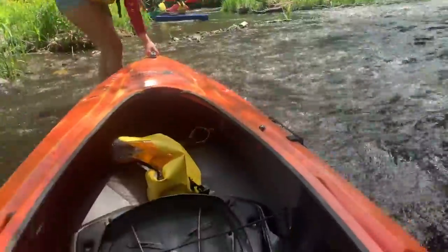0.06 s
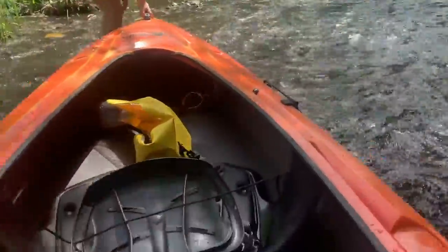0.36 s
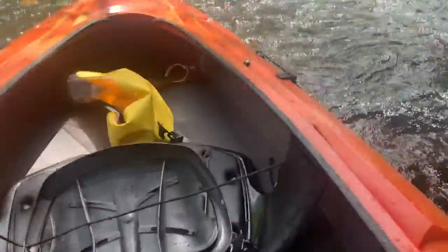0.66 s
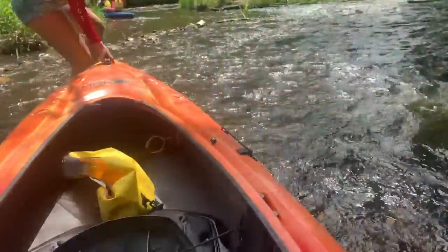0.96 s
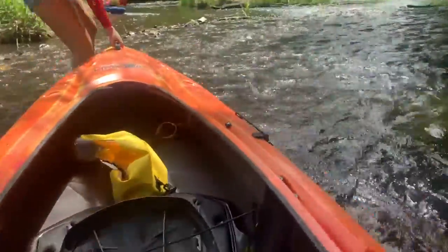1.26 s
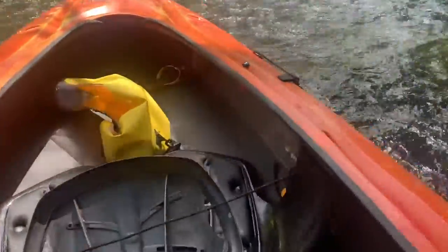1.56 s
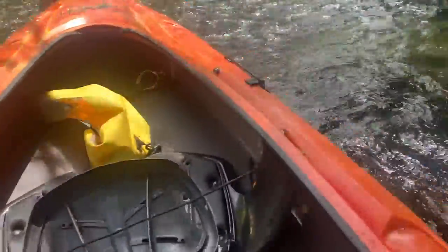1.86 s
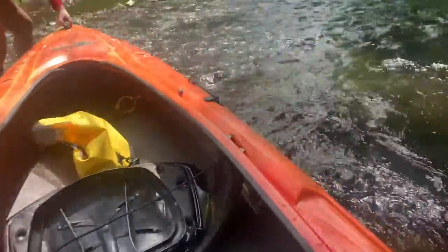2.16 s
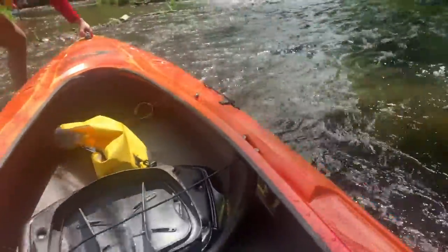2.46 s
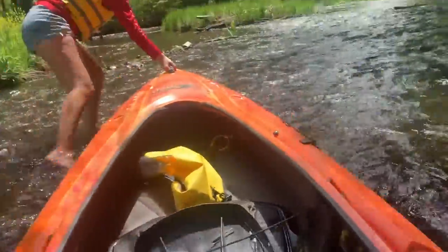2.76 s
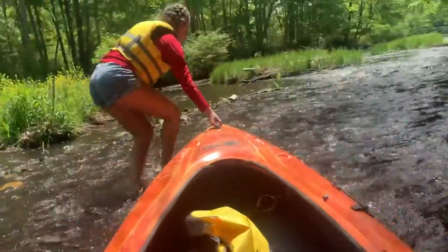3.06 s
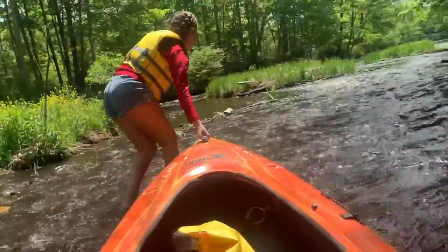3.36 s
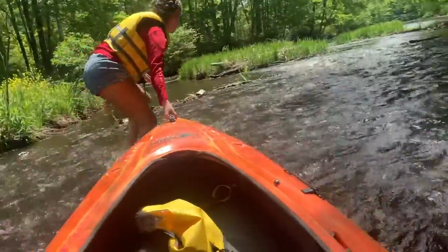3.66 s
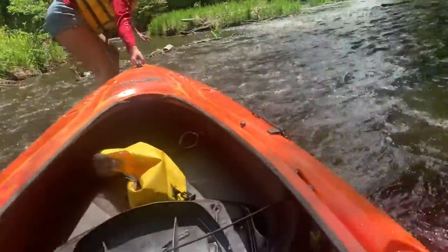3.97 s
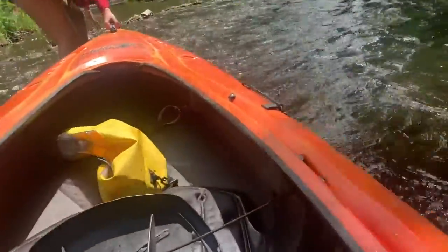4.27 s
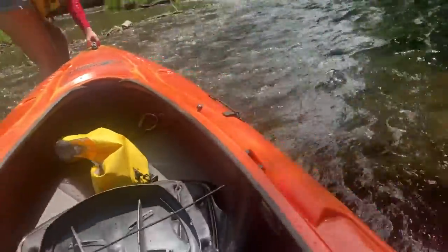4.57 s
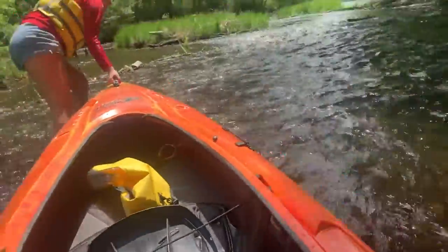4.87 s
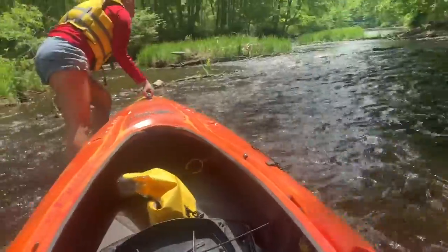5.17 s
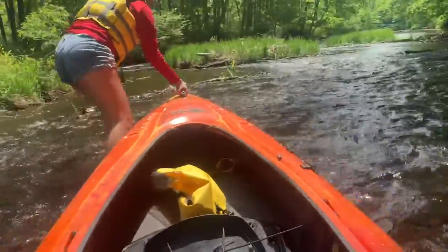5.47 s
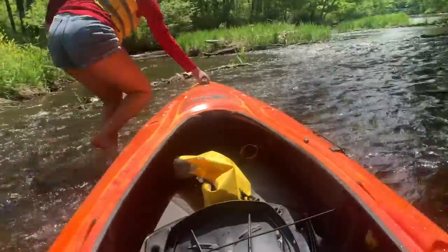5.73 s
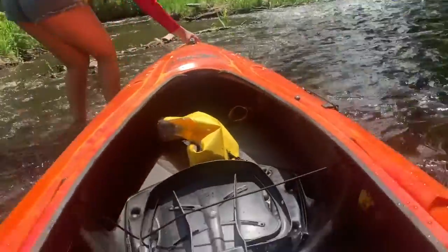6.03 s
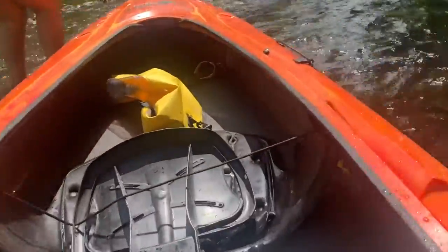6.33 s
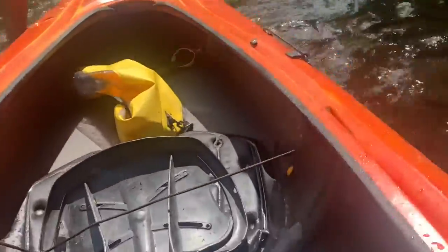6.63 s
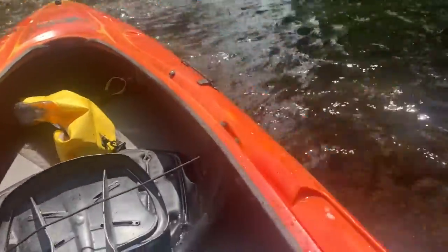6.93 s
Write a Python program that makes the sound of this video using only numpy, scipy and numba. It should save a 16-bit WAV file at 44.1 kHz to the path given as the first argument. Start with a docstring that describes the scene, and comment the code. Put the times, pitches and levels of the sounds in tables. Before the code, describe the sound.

Shallow river water rushes and bubbles around a plastic kayak being towed over a stony bed. The microphone sits in the cockpit, right above a low, uneven grinding and the drone of the hollow hull. Stones thud and crack against the shell, and the floor booms, most strongly near the middle and towards the end. Drips and fine spray tick nearby, a little wind rumbles, and it ends on a splashy bump.

```python
"""Water churns and plinks close by over a low scrape: a plastic kayak is being towed by its bow through
a stony riffle, with the microphone in the cockpit. The current, wading legs and the bow throw spray and
fold in air that rings as bubbles. Right underneath, the hull grinds over gravel and knocks on stones,
its floor booms as it springs back, and the air inside drones. A little wind buffets the two
microphone ports, and a few drops tap beside the right one."""
import sys
import numpy as np
from scipy import signal
from scipy.fft import rfft, irfft
from scipy.io import wavfile
from scipy.ndimage import uniform_filter1d
from numba import njit

SR = 44100
rng = np.random.default_rng(int(sys.argv[2]) if len(sys.argv) > 2 else 0)


def wav_out(sig):
    """Save sig, one row per channel (or a flat mono array), as 16-bit PCM at SR to the path in sys.argv[1]."""
    wavfile.write(sys.argv[1], SR, np.round(np.clip(np.atleast_2d(sig).T, -1, 1) * 32767).astype(np.int16))


N = 308700
TIME = np.arange(N) / SR
TOP_HZ = 15900

# gusts at the microphone: start_s, length_s, level_db
WIND_GUSTS = [(3.0, 0.75, -38.5), (4.12, 0.062, -26), (6.2, 0.55, -38), (6.68, 0.34, -41)]
# spectrum of the eddies at the ports: frequency_hz, gain_db
WIND_SPECTRUM = [(10, -37), (28, -9), (50, 9), (90, -6), (160, -7.5), (400, -49), (2000, -56), (8000, -90)]
# drops landing beside the right port: start_s, level_db, decay_s, centre_hz
PORT_TAPS = [(4.216, -21, .004, 800), (4.2528, -18, .0012, 950), (6.5635, -15.5, .0012, 900),
             (6.571, -17, .001, 1900)]
# water surging round the legs and the bow: start_s, length_s, churn_db, spray_db
WATER_SURGES = [(0.776, 0.32, -50.5, -51), (0.954, 0.023, -40, -52), (1.266, 0.031, -42.5, -38),
                (1.38, 0.28, -50, -57), (1.813, 0.53, -44.5, -45), (2.438, 0.14, -44.5, -43.5),
                (2.597, 0.14, -44.5, -41.5), (3.065, 0.061, -46.5, -43), (4.033, 0.63, -52.5, -52),
                (4.444, 0.37, -48, -47), (4.543, 0.16, -41.5, -45), (4.882, 0.74, -51, -52),
                (5.64, 0.19, -50, -48), (5.877, 0.14, -50.5, -46), (6.34, 0.19, -50, -48),
                (6.616, 0.37, -49, -51.5), (6.774, 0.096, -39.5, -44.5)]
# spectrum of the churning water: frequency_hz, gain_db
CHURN_SPECTRUM = [(100, -13), (300, -8), (600, 9.5), (1000, 5), (1800, -0.7), (3000, -5.5), (4200, -11.5),
                  (5500, -23.5), (8000, -151)]
# spectrum of the fine spray: frequency_hz, gain_db
SPRAY_SPECTRUM = [(1000, -30), (4000, -14), (5500, -10), (6500, -3.5), (7400, 0), (10000, -2),
                  (13000, -3.5), (16000, -7)]
# flung spray and drips falling back: start_s, level_db, decay_s, centre_hz
NEAR_SPLASHES = [(.079, -30, .011, 3700), (.579, -31, .0015, 9000), (.644, -32, .004, 12500),
                 (.799, -30, .002, 9500), (.853, -30, .003, 9500), (.957, -30, .002, 9000),
                 (.974, -29, .002, 9000), (1.2446, -25, .0026, 9500), (1.274, -30, .003, 9000),
                 (1.482, -28, .002, 10500), (1.587, -28, .003, 8000), (1.917, -25.5, .002, 9500),
                 (2.206, -26, .002, 9700), (2.326, -26, .002, 8500), (2.493, -25, .003, 8500),
                 (2.918, -30, .0045, 3600), (3.049, -27, .004, 9000), (3.114, -26, .005, 9000),
                 (3.232, -21.5, .004, 8700), (3.279, -29, .006, 9000), (3.327, -30, .008, 3400),
                 (3.75, -25, .003, 9500), (3.843, -29, .0015, 9500), (4.062, -28, .004, 9500),
                 (4.352, -26, .002, 12000), (4.656, -26, .002, 9500), (5.073, -25, .0012, 9500),
                 (5.085, -24, .0012, 12000), (5.13, -26.5, .0025, 9700), (5.405, -24.5, .0015, 9300),
                 (5.711, -26, .002, 9000), (5.746, -26, .003, 9000), (5.935, -28, .004, 3600),
                 (5.9355, -20.5, .0048, 9050), (6.013, -27.5, .003, 9100), (6.022, -28.5, .003, 9500),
                 (6.5, -28, .004, 9000), (6.535, -30, .016, 2980), (6.596, -29, .004, 9000),
                 (6.699, -29, .002, 13000), (6.789, -28, .008, 2300), (6.801, -22, .004, 7600),
                 (6.83, -19, .002, 11000), (6.84, -20, .003, 7500), (6.851, -23, .003, 9000),
                 (6.914, -27, .004, 2400), (6.987, -17, .0013, 11000)]
# big air pockets by the legs and under the hull: start_s, level_db, pitch_hz, length_s
AIR_GULPS = [(.745, -31, 234, 0.047), (0.989, -17.5, 195, 0.014), (2.147, -29.5, 274.5, 0.068),
             (2.195, -20.5, 184.5, 0.046), (2.245, -29, 203, 0.034), (2.617, -21, 272, 0.031),
             (4.102, -16, 209, 0.038), (5.387, -17.5, 230, 0.014), (5.403, -20, 179, 0.0153),
             (5.793, -27, 195, 0.018), (5.968, -15.5, 179.5, 0.028), (5.99, -13.5, 222, 0.015)]
# the clearest bubbles, from deep glugs to small drops: start_s, level_db, pitch_hz
NEAR_BUBBLES = [(.058, -24, 1040), (.058, -29, 760), (.23, -33, 1490), (.256, -31, 680), (.358, -32, 520),
                (.509, -33, 1330), (.512, -33, 400), (.839, -30, 1270), (1.284, -34, 2470),
                (1.294, -32, 1700), (1.835, -26, 430), (2.311, -29, 8250), (2.527, -31, 1830),
                (2.634, -20.5, 560), (2.637, -29, 2300), (2.646, -30, 1900), (2.72, -29, 1450),
                (2.732, -29, 1320), (2.918, -27, 2450), (3.054, -32, 3650), (3.087, -30, 1270),
                (3.36, -30, 1440), (3.551, -24.5, 1690), (3.667, -31, 3060), (4.094, -24, 680),
                (4.128, -29.5, 1880), (4.28, -31, 750), (4.453, -30, 8400), (4.479, -30, 4420),
                (4.625, -17.5, 1870), (4.777, -30, 7560), (5.353, -27, 570), (5.435, -24, 740),
                (5.677, -33, 2890), (5.935, -24, 650), (6.524, -31, 850)]
# air droning in the hull, before the floor pumps it: time_s, level_db
AIR_DRONE = [(0, -44.5), (.75, -33), (.95, -29.5), (2, -36.5), (2.5, -46), (3.3, -47), (5.2, -41.5),
             (6.6, -43.5), (7, -32)]
# modes of the plastic shell: pitch_hz, width_hz, gain_db
HULL_MODES = [(140.7, 19.6, 22), (164.5, 23, 16.5), (175, 20, 3), (226, 9.4, 9), (266, 23, -5.5),
              (311.8, 8.2, 12), (387, 53, -12), (459, 86, 2.5), (540, 71, -23), (701, 35, 4)]
# the hull scraping over the bed and heaving its floor: start_s, length_s, load_db, floor_db
BED_SCRAPES = [(0, 0.45, -40.5, -77), (0.664, 0.13, -31, -45), (0.834, 0.17, -32, -28.5),
               (1.413, 0.29, -35.5, -61), (1.79, 0.27, -31, -36.5), (2.117, 0.13, -33, -37.5),
               (2.484, 0.23, -31, -34.5), (2.822, 0.47, -41.5, -41.5), (3.458, 0.041, -33, -23),
               (3.858, 0.87, -40.5, -41), (4.405, 0.32, -27.5, -24), (4.765, 0.25, -42.5, -43),
               (5.39, 0.22, -36.5, -36), (5.574, 0.14, -31, -40), (5.794, .23, -29.5, -31.5),
               (6.06, 0.36, -38, -58), (6.65, 0.21, -38, -34.5), (6.837, 0.064, -27, -23)]
# spectrum of the grinding contact: frequency_hz, gain_db
GRIND_SPECTRUM = [(60, -20), (130, -12), (220, 6.5), (350, 3), (550, 0.5), (900, -9), (1800, -12),
                  (4000, -24)]
# the floor springing back off a stone: start_s, level_db, pitch_hz, t60_s
FLOOR_BOOMS = [(0.886, -25, 102, 0.17), (1.031, -14.5, 84.5, 0.15), (2.895, -6.5, 84, 0.17),
               (3.479, -15.5, 88.7, 0.44), (4.699, -17.5, 82.3, 0.55), (5.422, -17.5, 90.3, 0.23),
               (5.788, -10, 108, 0.12), (6.902, -9.5, 83, 0.27)]
# stones striking the hull: start_s, level_db, first_pitch_hz, length_s, crack_db (against the thud)
STONE_KNOCKS = [(.599, -21, 792, 0.063, 0.5), (0.818, -25.5, 364, 0.022, -20), (0.839, -23, 520, .022, 1),
                (0.966, -20.5, 420, 0.02, -12), (1.295, -29.5, 477, 0.088, -8),
                (1.632, -15.5, 648, 0.057, 1.5), (1.884, -23, 650, 0.0049, 1.5),
                (1.933, -21.5, 426, 0.012, -4), (2.021, -18, 334, 0.0073, -20),
                (2.055, -25, 282, 0.005, -22), (2.198, -15, 267, .014, -28), (2.528, -19, 342, 0.019, -22),
                (2.608, -24, 282, 0.032, -10), (2.672, -31, 520, 0.0051, -9), (2.72, -23.5, 403, 0.05, -10),
                (2.88, -17.5, 232, 0.018, -31), (3.464, -14, 322, 0.0043, -19),
                (3.478, -14, 243, 0.016, -28), (4.195, -20.5, 290, 0.02, -20),
                (4.452, -24.5, 265, .21, -26), (4.498, -13.5, 634, .018, 1.5), (4.522, -17, 328, .008, -20),
                (5.135, -26.5, 665, 0.0063, -13), (5.266, -19.5, 596, 0.031, -1.5),
                (5.294, -17, 241, 0.014, -25), (5.338, -19.5, 628, 0.016, -20),
                (5.763, -18.5, 597, 0.044, -2.5), (5.805, -13.5, 252, .008, -21),
                (5.828, -13, 270, 0.008, -26), (5.841, -10.5, 426, 0.0024, -16),
                (5.861, -20, 333, 0.0047, -14), (5.924, -23.5, 463, 0.009, -15),
                (6.027, -21.5, 330, 0.0058, -6), (6.083, -25.5, 535, 0.068, -15),
                (6.669, -24.5, 198, 0.031, -30), (6.8127, -12.5, 530, 0.0063, -5.5),
                (6.823, -19, 403, 0.029, -9), (6.886, -19.5, 276, 0.013, -15)]
# the right port against the left: frequency_hz, gain_db, phase_rad, coherence
RIGHT_PORT = [(30, 0, 0, .97), (200, -.5, -.1, .99), (300, 1.5, -.35, .88), (365, 4.5, -.8, .55),
              (430, 2, -1.5, .9), (700, -5, -1.5, .85), (1000, -8, -1.5, .15), (1150, -7, -4.5, .35),
              (1400, -5, -5.1, .7), (1900, -6, -5.6, .62), (2400, -7, -4.5, .1), (2900, -7, -2.9, .6),
              (3600, -10, -2.8, .35), (4100, -9, -.8, .55), (5400, -3, -.2, .65), (6300, -.5, 2.7, .97),
              (7300, 0, 3.55, .97), (9280, 0, 6.28, .88), (16000, 0, 15.4, .8)]


def undb(db):
    """Decibels to gain."""
    return 10 ** (np.asarray(db) / 20)


def unit(x):
    """Scale to rms 1."""
    return x / np.sqrt(np.mean(x ** 2))


def peak(x):
    """Scale to peak 1."""
    return x / np.abs(x).max()


def filtered(x, response):
    """Pass x through a response given as a function of frequency."""
    size = x.shape[-1]
    hz = np.maximum(np.fft.rfftfreq(size, 1 / SR), 1)
    return irfft(rfft(x) * response(hz), size)


def colour(x, spectrum):
    """Shape x by (frequency_hz, gain_db) points."""
    hz, db = np.transpose(spectrum)
    return filtered(x, lambda f: undb(np.interp(np.log(f), np.log(hz), db)))


def resonance(f, hz, width):
    """Response of one damped mode, gain 1 at its centre."""
    return 1 / (1 + 1j * (f * f - hz * hz) / (f * width))


def band(x, hz, width_hz, order=2):
    """Pass x through the same resonance order times."""
    return filtered(x, lambda f: resonance(f, hz, width_hz) ** order)


def noise(size=N):
    """Two unrelated rows of white noise."""
    return rng.standard_normal((2, size))


def walk(rate_hz):
    """Random levels held 1 / rate_hz seconds and smoothed twice; spread near 1."""
    hold = int(SR / rate_hz)
    steps = np.repeat(rng.standard_normal(N // hold + 1), hold)
    return 1.3 * uniform_filter1d(uniform_filter1d(steps, hold), hold)[:N]


def add(out, start_s, x):
    """Mix x into out from start_s on."""
    i = max(int(start_s * SR), 0)
    out[:, i:i + x.shape[-1]] += x[..., :max(N - i, 0)]


def swells(rows, rest_db, attack_s, release_s, column=2):
    """Level in dB of swells that rise, hold and die over a resting level; column holds their level_db."""
    power = undb(rest_db) ** 2
    for start_s, length_s, level_db in np.array(rows)[:, [0, 1, column]]:
        rise = np.clip((TIME - start_s) / attack_s, 0, 1)
        fall = np.exp(-np.maximum(TIME - start_s - length_s, 0) / release_s)
        power = power + (undb(level_db) * rise * fall) ** 2
    return 10 * np.log10(power)


def wind():
    """Eddies buffet each microphone port on its own."""
    eddies = unit(colour(noise(), WIND_SPECTRUM))
    gust_db = swells(WIND_GUSTS, rest_db=-45.5, attack_s=0.088, release_s=0.091)
    return eddies * undb(gust_db + 0.5 * walk(16))


def lapping(level_db=-49):
    """Ripples pat the side of the boat and keep one hollow note of the shell murmuring."""
    return undb(level_db) * unit(band(noise(), hz=214.8, width_hz=36))


@njit
def ring_bubbles(start_s, size, hz, cycles, glide, scatter_rad):
    """Bubbles ring down and rise in pitch; row 0 is direct, row 1 scattered with its own phase."""
    out = np.zeros((2, N))
    for k in range(len(start_s)):
        start, length, phase = int(start_s[k] * SR), cycles[k] * SR / hz[k], 0.
        for i in range(min(int(length), N - start)):
            age = i / length
            phase += 2 * np.pi * hz[k] * (1 + glide * age) / SR
            envelope = 2 * size[k] * np.exp(-6 * age) * min(10 * age, 1.)
            out[0, start + i] += envelope * np.sin(phase)
            out[1, start + i] += envelope * np.sin(phase + scatter_rad[k])
    return out


def riffle(churn_db, spray_db, count=40000, far_hiss_db=-55):
    """All round the boat, a cloud of bubbles over a smooth rush; churn drives the lows, spray the highs."""
    when, pitch, chance, ring, angle = rng.random((count, 5)).T
    hz = 250 + pitch * (TOP_HZ - 250)
    size = np.sqrt(hz) * undb(1.5 * np.minimum(-np.log(1 - chance), 4.5))
    cloud = ring_bubbles(when * N / SR, size, hz, 20 * (.5 + ring), 0.18, 2 * np.pi * angle)
    flow = unit(cloud) + undb(1) * noise()
    churn = unit(colour(flow, CHURN_SPECTRUM)) * undb(churn_db + 7.5 + 1.4 * walk(35))
    # the wide riffle hisses on steadily behind the spray near the boat
    spray_gain = np.hypot(undb(spray_db - 1.5 + 1.2 * walk(90)), undb(far_hiss_db))
    return churn + unit(colour(flow, SPRAY_SPECTRUM)) * spray_gain


def stray_glugs(count=75):
    """Lone pockets of air gurgle up between the stones, rising in pitch; high ones are quieter."""
    when, pitch, strength, angle = rng.random((count, 4)).T
    hz = 380 * 2 ** (2 * pitch)
    size = undb(-38 - 6 * pitch + 5 * strength)
    return ring_bubbles(when * N / SR, size, hz, np.full(count, 32.), .2, 2 * np.pi * angle)


def gurgle(level_db, count, low_hz, octaves):
    """Pockets of air fold under along the hull and ring briefly."""
    when, pitch, chance, angle = rng.random((count, 4)).T
    hz = low_hz * 2 ** (octaves * pitch)
    size = (low_hz / hz) ** .5 * undb(3.5 * np.minimum(-np.log(1 - chance), 3))
    glugs = ring_bubbles(when * N / SR, size, hz, np.full(count, 15.), .15, 2 * np.pi * angle)
    return unit(glugs) * undb(level_db)


def stray_spray(spray_db, count=330):
    """Fine drops tick at random, louder with the spray: start_s, level_db, decay_s, centre_hz."""
    when, size, pitch, decay = rng.random((count, 4)).T
    surge_db = spray_db[(when * N).astype(int)] + 48  # above the resting spray
    level_db = -41.5 + 6 * size ** 2 + .7 * surge_db
    return np.column_stack([when * N / SR, level_db, .001 + .002 * decay, 7000 + 7500 * pitch])


def drop_impacts(rows, relative_width, size=2048):
    """Each drop lands with a snap and a quickly dying noise, in one band."""
    out, t = np.zeros((2, N)), np.arange(size) / SR
    for start_s, level_db, decay_s, hz in rows:
        impact = 2 * (t == 0) + noise(size) * np.exp(-t / decay_s)
        add(out, start_s, undb(level_db) * peak(band(impact, hz, relative_width * hz)))
    return out


def gulps(size=8192, sag_per_s=3.4, slop_hz=480, slop_db=-12):
    """A pocket of air closes, swells into one round note and dies, with a little wet slop."""
    out, t = np.zeros((2, N)), np.arange(size) / SR
    for start_s, level_db, hz, length_s in AIR_GULPS:
        swell = peak((t / length_s) ** 2 * np.exp(-4.5 * t / length_s))
        note = np.sin(2 * np.pi * np.cumsum(hz * np.exp(-sag_per_s * t)) / SR)
        slop = unit(band(noise(size), slop_hz, slop_hz, order=3))
        add(out, start_s, undb(level_db) * swell * (note + undb(slop_db) * slop))
    return out


def faint_bubbles(count=24):
    """Small bubbles at chance moments, the high ones quieter: start_s, level_db, pitch_hz."""
    when, pitch, strength = rng.random((count, 3)).T
    return np.column_stack([when * N / SR, -41 - 7 * pitch + 5 * strength, 1500 * 2 ** (2.2 * pitch)])


def near_bubbles(glide=0.03, plop_db=-6, plop_s=.008):
    """Close to the cockpit, single bubbles break the surface with a wet plop and ring on."""
    starts, levels, pitches = np.vstack([NEAR_BUBBLES, faint_bubbles()]).T.copy()
    cycles = 34 * (pitches / 1000) ** .3  # small bubbles ring for more cycles
    scatter_rad = rng.uniform(0, 2 * np.pi, len(starts))
    out = ring_bubbles(starts, undb(levels), pitches, cycles, glide, scatter_rad)
    out *= .9 + .18 * walk(350) + .2 * walk(1500)  # jostled by the current
    fade = np.exp(-TIME[:4096] / plop_s)
    for start_s, level_db, hz in zip(starts, levels, pitches):
        plop = band(noise(len(fade)) * fade, hz, hz / 3)
        add(out, start_s, undb(level_db + plop_db) * peak(plop))
    return out


def cockpit_drone(floor_db, sway_db=-15, pump_db=-8):
    """Air in the hull drones, louder as the heaving floor pumps it; the boat sways below that note."""
    air = unit(band(noise(), hz=53.4, width_hz=9.4))
    sway = unit(band(noise(), hz=35, width_hz=13, order=3))
    rest_db = np.interp(TIME, *np.transpose(AIR_DRONE))
    return (air + undb(sway_db) * sway) * np.hypot(undb(rest_db), undb(floor_db + pump_db))


def hull(f):
    """The shell passes a push on directly and rings in its modes."""
    modes = sum(undb(db) * resonance(f, hz, width) for hz, width, db in HULL_MODES)
    return 0.04 * resonance(f, 400, 1600) + modes


def grinding(load_db, floor_db, count=4500):
    """Gravel catches and slips under the hull, right below the microphone, and the floor heaves."""
    when, size, scatter = rng.random((count, 3)).T
    slips = np.zeros((2, N))
    slips[:, (when * N).astype(int)] = (.5 + size) * np.array([np.ones(count), np.sign(scatter - .5)])
    shell = unit(colour(filtered(slips, hull), GRIND_SPECTRUM))
    floor = unit(band(noise(), hz=91.6, width_hz=23))
    return shell * undb(load_db + 1) + floor * undb(floor_db - 2)


def floor_booms(size=22050, rise_s=0.01, overtone_db=-14):
    """The broad floor flexes back and rings in its lowest mode, with a shorter overtone."""
    out, t = np.zeros((2, N)), np.arange(size) / SR
    for start_s, level_db, hz, t60_s in FLOOR_BOOMS:
        rise, fade = 1 - np.exp(-t / rise_s), undb(-60 * t / t60_s)
        phase = 2 * np.pi * hz * t
        overtone = undb(overtone_db) * fade * np.sin(2.7 * phase)
        add(out, start_s, undb(level_db) * rise * fade * (np.sin(phase) + overtone))
    return out


def bending_thud(t, push, first_hz, last_hz=132, fall_s=0.02132):
    """Bending waves bring a blow to the cockpit highs first, so two notes fall in pitch."""
    sharpness = first_hz / 260
    pitch_hz = last_hz + (first_hz - last_hz) / (1 + t * sharpness ** 1.55 / fall_s)
    phase = 2 * np.pi * np.cumsum(pitch_hz) / SR
    # a sharp push sends waves by many paths, which blurs their phase
    blur = 0.25 * sharpness * unit(filtered(noise(len(t)), lambda f: 1 / (1 + (f / 110) ** 4)))
    upper_gain = undb(-11) * sharpness * push * (250 / np.maximum(pitch_hz, 250)) ** 2
    notes = np.sin(phase + blur[0]) + upper_gain * np.sin(2.1 * phase + 2 * blur[1])
    return peak(push * (1 - np.exp(-3 * first_hz * t)) * notes)


def stone_knocks(size=16384, crack_s=0.011, judder_db=-9, body_db=-5, body_lag_s=0.012):
    """A stone thuds on the hull and judders on; hard contacts crack, and the hollow shell rings last."""
    out, t = np.zeros((2, N)), np.arange(size) / SR
    impulse = 1. * (t == 0)
    for start_s, level_db, hz, length_s, crack_db in STONE_KNOCKS:
        push = np.exp(-(t / length_s) ** 2)
        thud = bending_thud(t, push, hz)
        shell = lambda f: hull(f) * resonance(f, hz, 2 * hz)
        body = peak(filtered(impulse, shell) * (1 - np.exp(-t / body_lag_s)))
        body *= min(length_s / 0.026, 1)  # brief pushes ring the shell less
        judder = peak(filtered(noise(size) * push, shell))
        contact = impulse + .12 * noise(size) * np.exp(-t / crack_s)
        crack = peak(filtered(contact, lambda f: resonance(f, 850, 1000) ** 2 / (1 + (f / 2100) ** 6)))
        knock = .95 * thud + undb(body_db) * body + undb(judder_db) * judder + undb(crack_db) * crack
        add(out, start_s, undb(level_db) * knock)
    return out


def microphone_ports(field):
    """The left port hears the direct row; the right hears it shifted and shaded, plus the scattered row."""
    hz, db, phase, coherence = np.transpose(RIGHT_PORT)
    direct_gain = undb(db) * coherence
    scattered_gain = undb(db) * np.sqrt(np.clip(1 - coherence ** 2, 0, 1))
    direct = filtered(field[0], lambda f: np.interp(f, hz, direct_gain) * np.exp(1j * np.interp(f, hz, phase)))
    scattered = filtered(field[1], lambda f: np.interp(f, hz, scattered_gain))
    return np.array([field[0], direct + scattered])


def scene():
    """From the cockpit: boat and river through the air, wind and dull taps right at the ports."""
    load_db = swells(BED_SCRAPES, rest_db=-49.5, attack_s=0.023, release_s=0.074)
    floor_db = swells(BED_SCRAPES, rest_db=-46, attack_s=0.023, release_s=0.074, column=3)
    churn_db = swells(WATER_SURGES, rest_db=-47, attack_s=0.015, release_s=0.028)
    spray_db = swells(WATER_SURGES, rest_db=-48, attack_s=0.033, release_s=0.014, column=3)
    boat = grinding(load_db, floor_db) + stone_knocks() + floor_booms()
    boat += cockpit_drone(floor_db) + lapping()
    river = gurgle(churn_db + 1.5, count=850, low_hz=200, octaves=2.83)
    river += gurgle(churn_db - 4, count=500, low_hz=697, octaves=2.1)
    river += gulps() + stray_glugs() + near_bubbles() + riffle(churn_db, spray_db)
    river += drop_impacts([*NEAR_SPLASHES, *stray_spray(spray_db)], relative_width=0.72)
    taps = drop_impacts(PORT_TAPS, relative_width=1.6) * undb([[-6], [0]])  # left, right
    return microphone_ports(boat + river) + wind() + taps


def record(dry):
    """The camera that holds the microphone cuts the treble above TOP_HZ."""
    return signal.sosfilt(signal.ellip(10, .2, 80, TOP_HZ, fs=SR, output="sos"), dry)


dry = scene()
out = record(dry)
wav_out(out)
```